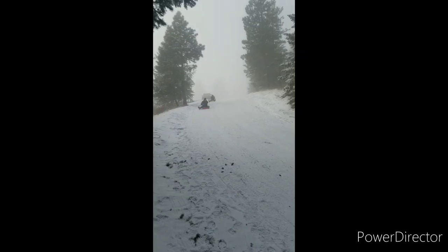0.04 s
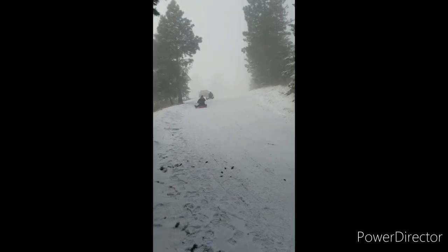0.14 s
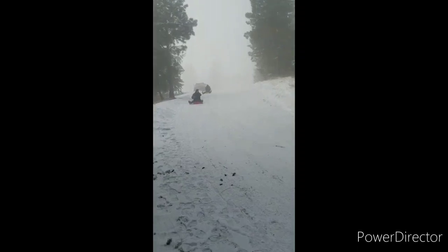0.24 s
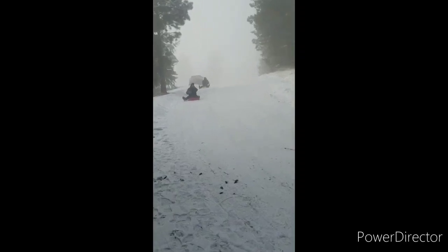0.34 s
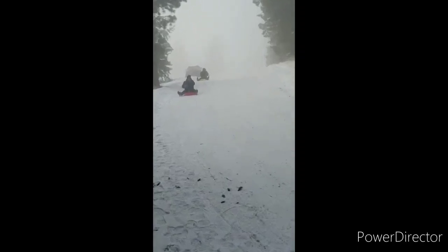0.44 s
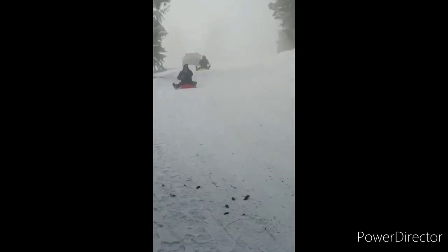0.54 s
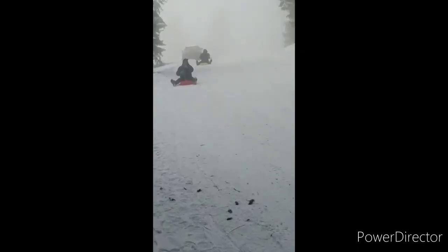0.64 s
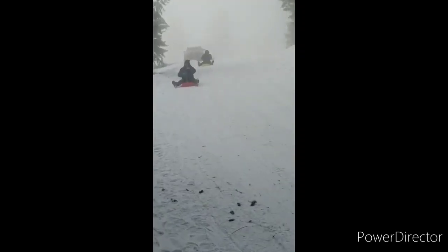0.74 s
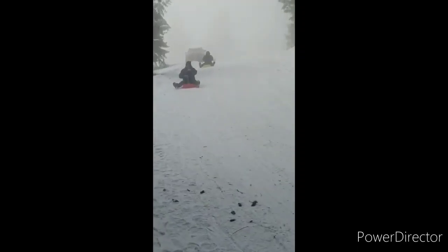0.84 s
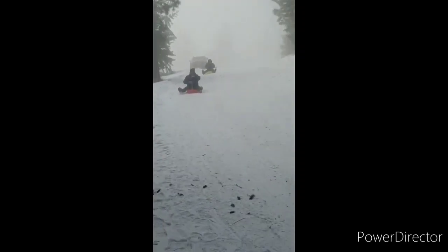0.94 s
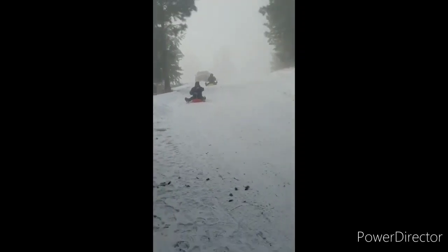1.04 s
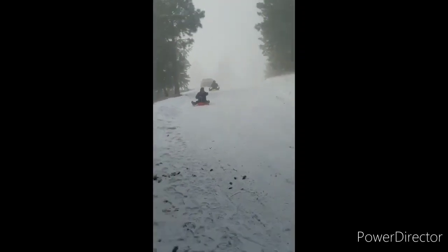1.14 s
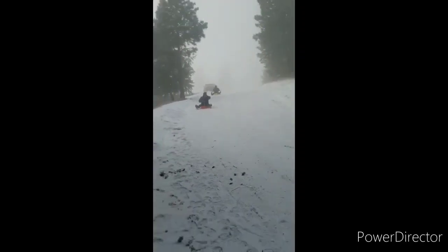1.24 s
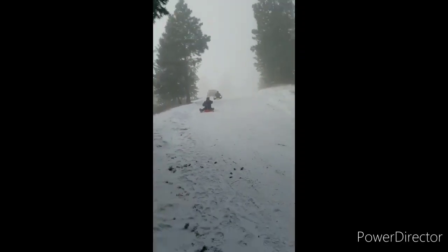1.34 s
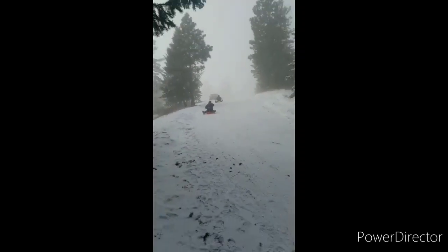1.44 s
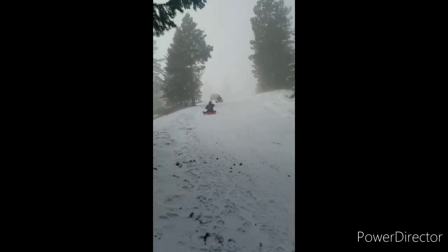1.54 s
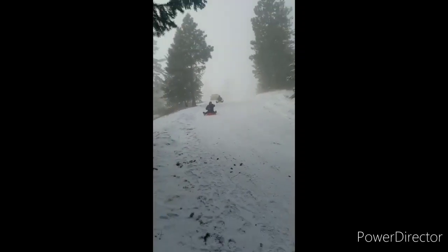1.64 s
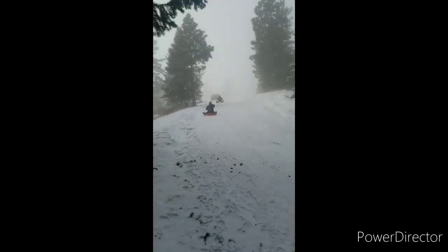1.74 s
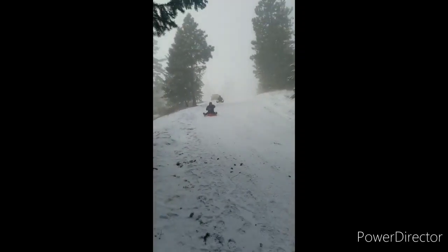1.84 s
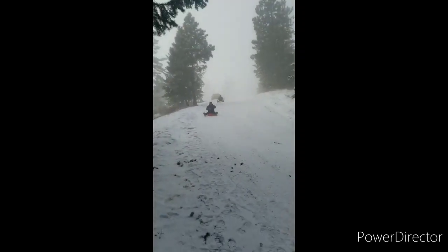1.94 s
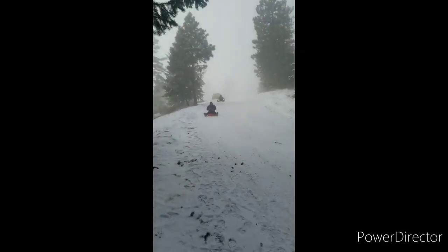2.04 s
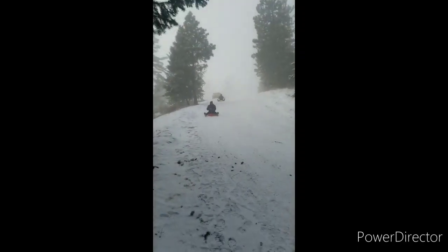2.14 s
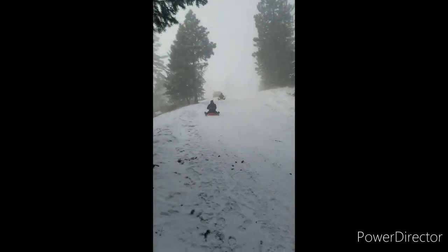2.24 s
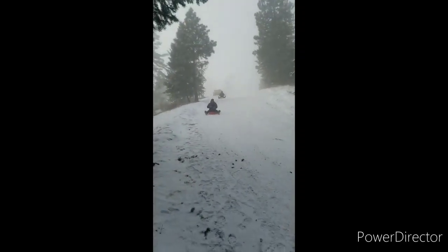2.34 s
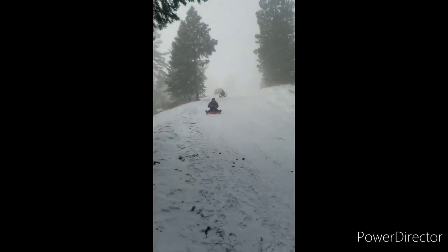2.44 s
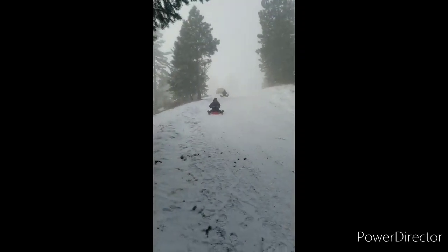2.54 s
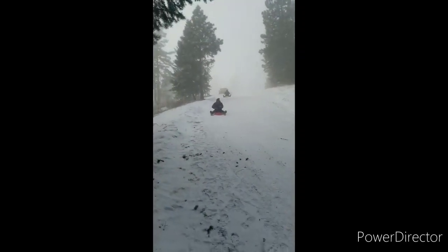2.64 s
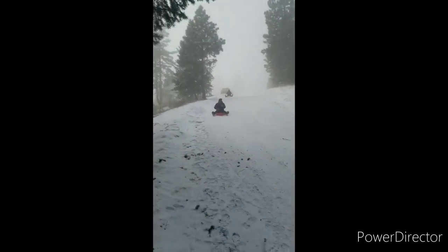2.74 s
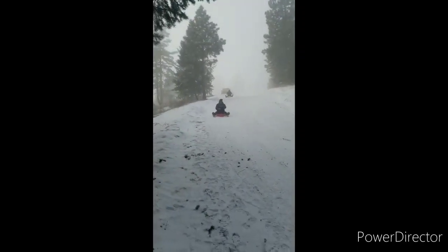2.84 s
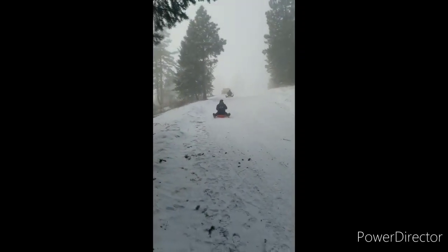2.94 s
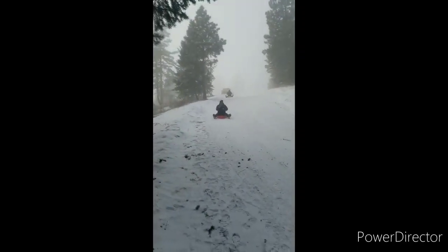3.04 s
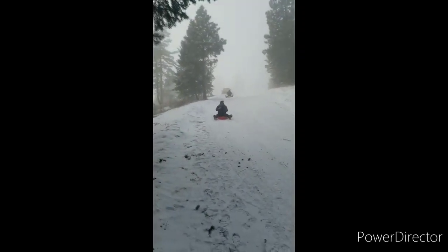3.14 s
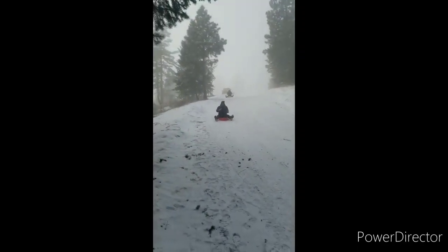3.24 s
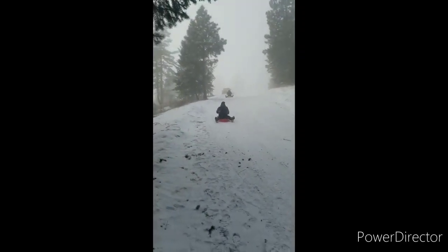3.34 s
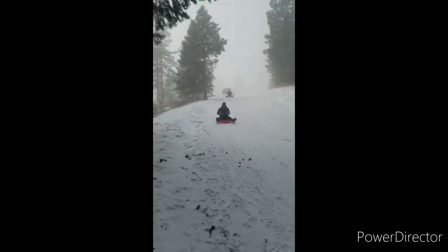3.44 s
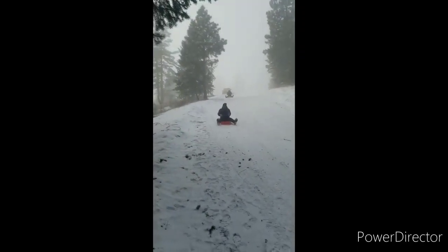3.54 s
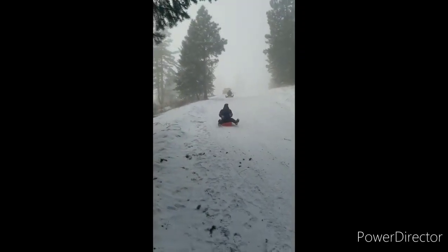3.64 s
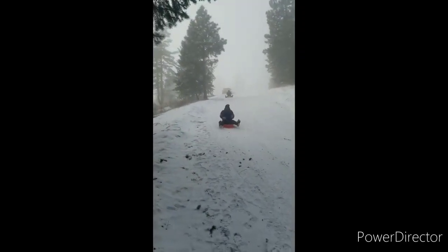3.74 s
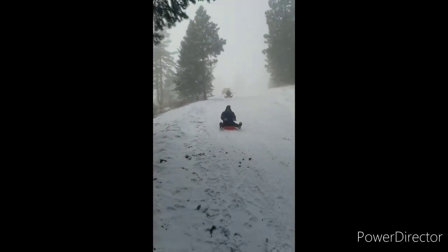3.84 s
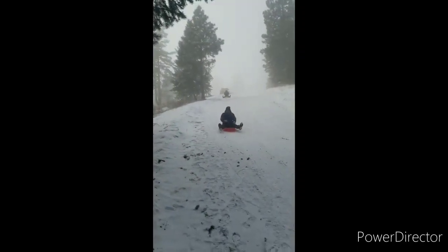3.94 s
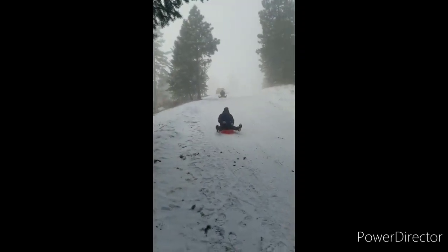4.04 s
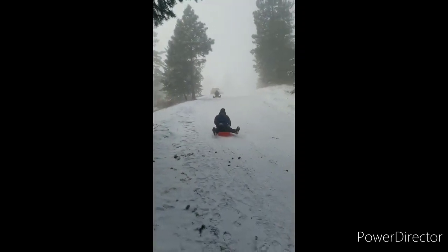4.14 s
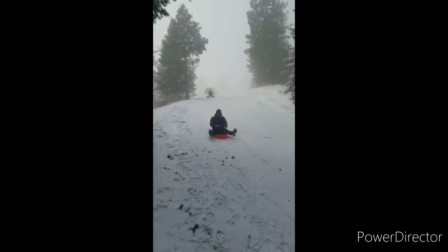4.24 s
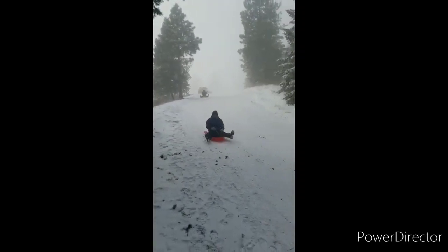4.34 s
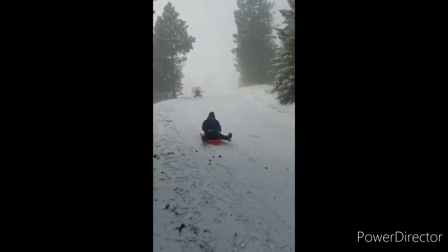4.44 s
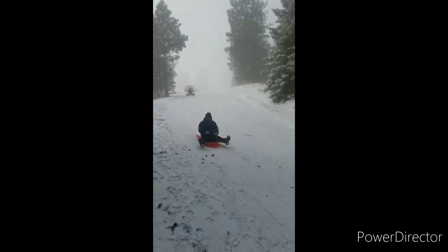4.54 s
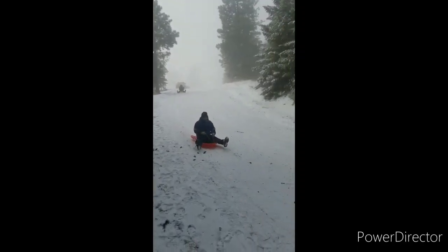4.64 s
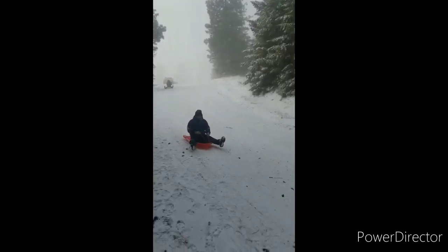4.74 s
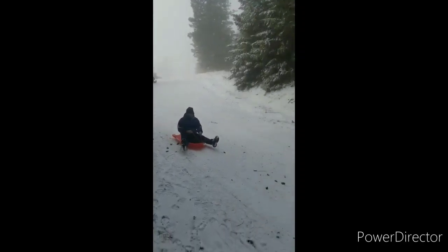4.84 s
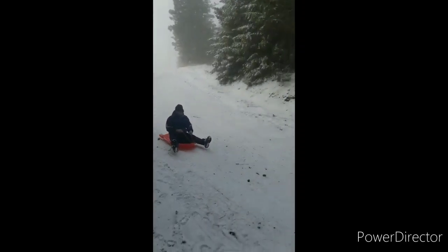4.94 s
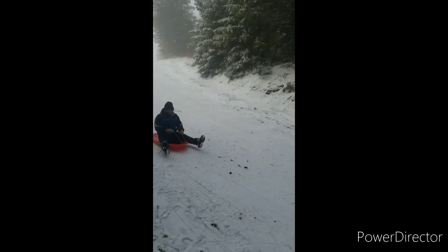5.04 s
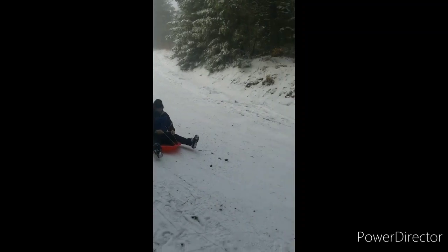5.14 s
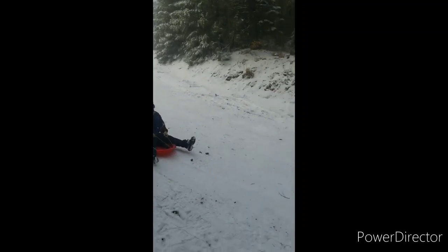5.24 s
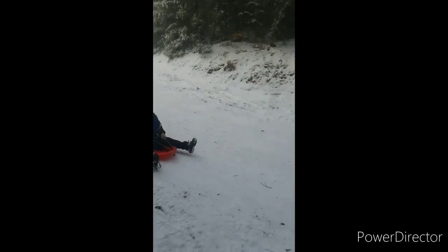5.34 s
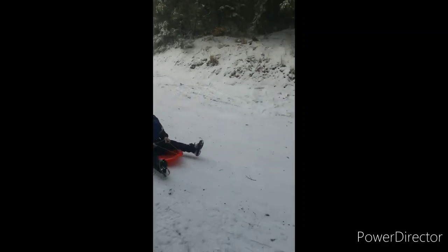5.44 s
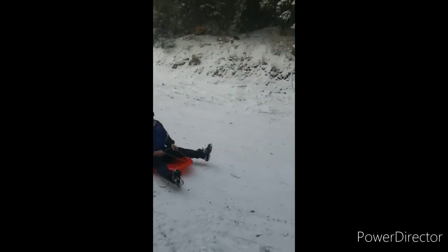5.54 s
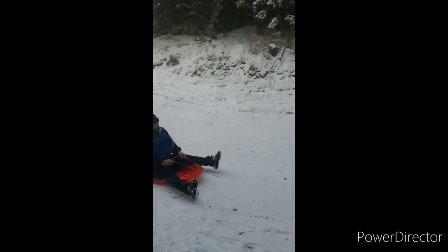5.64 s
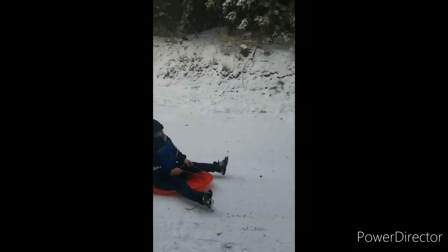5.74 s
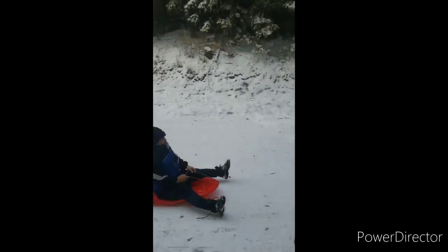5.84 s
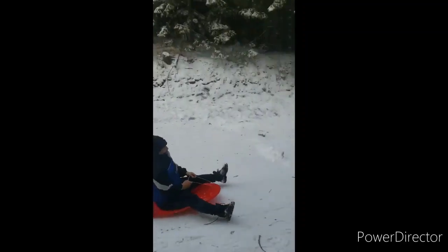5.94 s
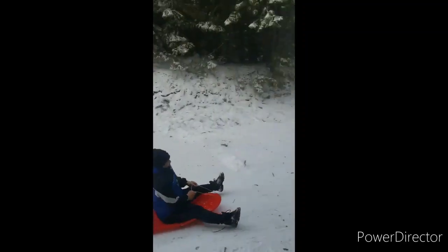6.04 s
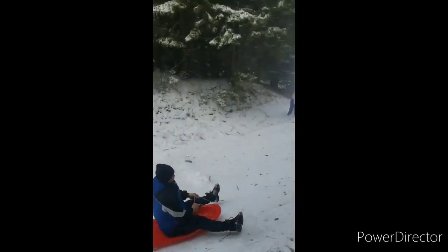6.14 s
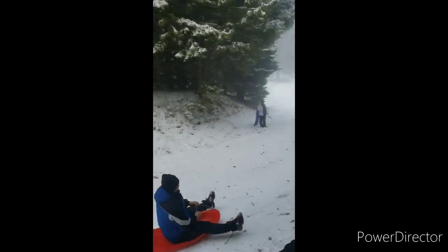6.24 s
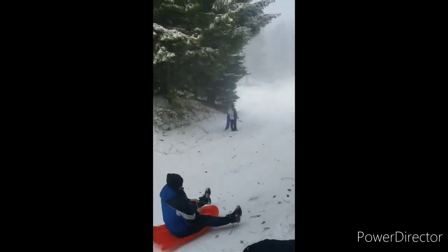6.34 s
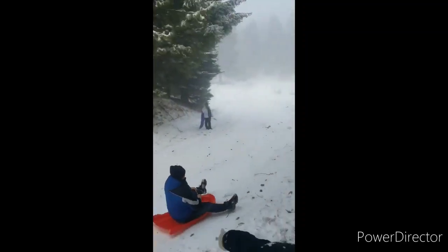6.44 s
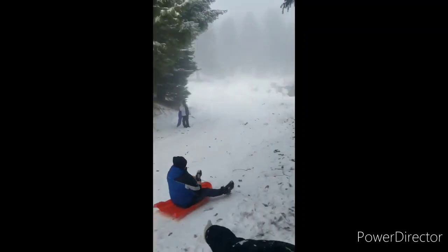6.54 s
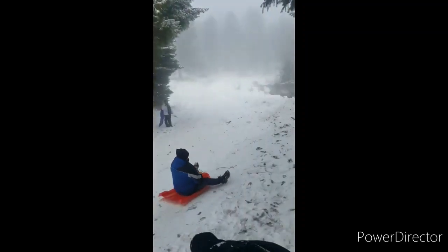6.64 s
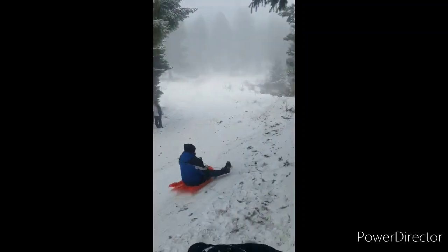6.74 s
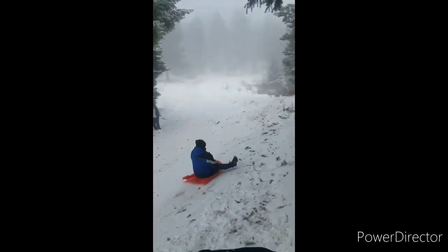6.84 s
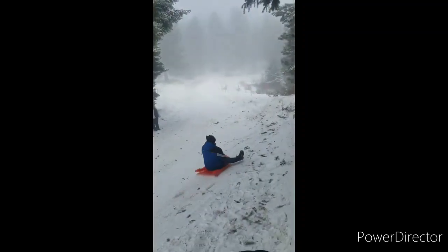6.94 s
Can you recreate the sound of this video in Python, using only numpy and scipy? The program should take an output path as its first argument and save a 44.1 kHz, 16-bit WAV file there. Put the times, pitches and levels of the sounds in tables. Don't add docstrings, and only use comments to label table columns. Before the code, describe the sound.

Outdoors in a still, snowy forest, heard through a hand-held stereo phone with faint microphone hiss. In the first 0.2 seconds, a few dry knocks and crust crunches sound nearby. Until about 3 seconds, the distant sled is a weak, patchy snow hiss with faint low rumble, briefly swelling near 1 second; sharp little flake clicks strike the right side, clustering at 2.7-2.9. From 3.4 the hollow plastic hull drums more clearly, with a tiny falling squeak at 3.85 and firm bumps and knocks around 4.05. From 4.4 to 6 the rough scraping and gritty hiss grow steadily, with frequent low thumps and wall rattles, including a strong thud at 5.55. It is loudest passing close around 6.1; a hard bright crack with a thud hits at 6.39. The scrape eases slightly, then a tight burst of heavy hollow bumps ends it at 6.9.

```python
import sys
import numpy as np
from scipy import signal
from scipy.fft import rfft, irfft
from scipy.io import wavfile
from scipy.ndimage import uniform_filter1d

SR = 44100
rng = np.random.default_rng(int(sys.argv[2]) if len(sys.argv) > 2 else 0)


def master_out(mix):
    frames = np.transpose(np.atleast_2d(mix))
    ceiling = np.clip(frames, -1, 1)
    pcm = np.round(ceiling * 32767).astype(np.int16)
    wavfile.write(sys.argv[1], SR, pcm)


def voltage_ratio(level):
    return 10 ** (np.asarray(level, float) / 20)


N = 308352
T = np.arange(N) / SR

# time_s, hull_load_db, iciness_db, hiss_left_right_db
TRACK = [(0.0, -49.5, 4, 0), (0.3, -49, -4, -5), (.39, -53, -2.5, -6), (.49, -49, -4, -6),
         (.56, -55, -2.5, -7), (0.65, -52.5, -4, -7), (0.76, -64.5, 3.5, -4), (0.97, -42.5, -3.5, 5),
         (1.05, -44, -8, 1), (1.13, -58.5, -7, -7), (1.32, -57, 8, -16), (1.6, -50, -3.5, -8.5),
         (2.0, -58, 2, -16), (2.6, -56, 2, -8.5), (2.94, -49.5, 0.5, -6), (3.36, -58.5, 5, -4),
         (4.1, -46.5, 3.5, -4.5), (5.1, -39.5, 3, -4.5), (5.85, -35, 2.5, -4), (6.12, -33, 2.5, -4.5),
         (6.6, -38.5, 6, -9)]
# peak_s, length_s, hull_press_db, ground_shake_db
RIDGES = [(0.106, 0.045, 8, 16), (0.58, 0.14, -4, 2.5), (0.632, 0.064, 4.5, -12), (1.088, 0.051, -4, 10),
          (1.318, 0.37, -10, 10.5), (1.76, 0.076, -5, -7), (1.8, 0.13, 3.5, 15), (2.118, 0.25, 9.5, 10),
          (2.332, 0.057, 12, 14), (2.41, 0.098, -8.5, 10), (2.508, .2, 11, 15), (2.684, 0.14, 2.5, 19),
          (2.847, 0.095, -9, 11.5), (2.895, .07, 11, 10), (3.45, 0.57, 7, -2), (3.782, 0.072, 13, 6),
          (4.066, 0.096, 12.5, 4.5), (4.482, 0.2, 4, 8), (4.762, 0.034, 4, 10), (4.884, 0.22, 1, 5.5),
          (5.244, .1, 3.5, 9), (5.343, 0.18, 4, 6), (5.54, 0.22, 5.5, 6.5), (5.772, 0.066, 3.5, 12),
          (6.357, 0.07, -3, -13), (6.403, 0.09, 7, 20), (6.463, 0.056, 8, 17.5), (6.609, .14, 6, 8.5),
          (6.892, 0.1, 17, 21.5), (6.985, 0.16, 8, 12)]
# pitch_hz, width_hz, level_db
HULL_MODES = [(154.4, 104, -3), (240, 134, -1), (320, 101, -1.5), (396, 200, -7)]
# pitch_hz, width_hz, level_db
WALL_MODES = [(549, 214, 3.5), (697, 190, 6.5), (858, 250, 5.5), (1031, 220, -1), (1410, 200, -1),
              (1750, 530, -26)]
# pitch_hz, width_hz, level_db
GROUND_MODES = [(65.6, 32, 5), (112, 58, 2)]
# pitch_hz, level_db (per Hz)
HISS = [(880, -7.5), (1500, -5), (1730, -4), (2310, -6), (3000, -9), (3820, -9.5), (5100, -7), (7080, -6.5),
        (9180, -12), (12400, -5), (14000, -8), (15000, -13.5)]
# pitch_hz, width_hz, level_db
SPRAY_MODES = [(1510, 650, -1.5), (2170, 290, -4), (3940, 880, -4)]
# start_s, peak_db, pitch_hz
BUMPS = [(0.305, -38, 280), (0.32, -41, 330), (0.5, -43, 300), (0.655, -46, 320), (6.045, -23, 380),
         (6.085, -24, 360), (5.955, -27, 380), (0.81, -47, 300), (6.41, -24, 280), (6.435, -25, 260),
         (6.46, -24, 300), (1.547, -39, 143), (1.598, -34.5, 375), (1.707, -41, 260), (2.082, -35, 284),
         (2.285, -39.5, 149), (2.47, -32.5, 322), (3.566, -33.5, 203), (3.69, -34, 212), (3.966, -26, 234),
         (4.056, -22, 242), (4.255, -27.5, 258), (4.343, -30.5, 214), (4.525, -30, 185),
         (4.579, -24.5, 243), (4.757, -24, 246), (4.836, -26.5, 236), (4.875, -21.5, 214),
         (5.078, -23.5, 203), (5.317, -17, 219), (5.476, -19.5, 240), (5.774, -17.5, 245),
         (5.807, -23.5, 305), (6.149, -20.5, 240), (6.187, -23, 212), (6.875, -11.5, 200),
         (6.882, -18, 330), (6.891, -16, 190), (6.915, -18, 330), (6.968, -21, 340), (6.907, -12.5, 270),
         (6.955, -16, 300), (6.979, -18.5, 310)]
# start_s, peak_db, pitch_hz
LUMPS = [(0.244, -42, 153), (0.298, -40, 164), (0.559, -54, 164), (0.589, -49, 196), (1.016, -38, 261),
         (1.039, -38, 229), (1.057, -37, 215), (4.459, -31, 277), (4.52, -31, 186), (4.615, -33, 194),
         (4.742, -29, 234), (4.939, -29, 272), (4.997, -31, 205), (5.152, -31, 172), (5.203, -32, 221),
         (5.224, -37, 301), (5.244, -35, 250), (5.492, -24, 226), (5.698, -32, 245), (5.934, -27, 345),
         (6.031, -25, 196), (6.057, -24, 275), (6.134, -24, 234), (6.172, -24, 240), (6.219, -28, 258),
         (6.308, -26, 272), (6.603, -29, 258), (6.757, -34, 328), (6.924, -25, 151), (6.944, -20, 215),
         (6.961, -20, 275)]
# start_s, peak_db, pitch_hz
THUDS = [(0.194, -50, 67.3), (.89, -58, 66), (2.5, -41, 65), (2.654, -36.5, 72), (3.407, -43, 99),
         (1.16, -46, 63), (1.46, -41.5, 64), (1.82, -43, 62), (2.57, -44, 60.3), (5.554, -16.5, 346),
         (6.387, -13.5, 377), (6.51, -33, 62), (6.8, -38, 65.6), (6.385, -24, 75.5), (6.875, -20.5, 75),
         (6.91, -22, 140), (6.94, -24, 66)]
# start_s, peak_db, pitch_hz, left_right_db
KNOCKS = [(0.077, -28.5, 560, -0.5), (0.097, -31.5, 430, -9), (0.151, -33, 622, -12), (2.476, -42, 557, 21),
          (2.892, -42, 710, 8), (3.767, -45, 780, 4), (4.059, -25.5, 533, 8), (4.408, -28.5, 640, 5),
          (4.429, -30, 800, 0.5), (4.458, -28.5, 540, 4), (4.526, -27.5, 576, -0.5), (4.719, -30.5, 630, 3),
          (4.799, -31, 800, 2), (4.873, -26.5, 794, 3), (5.464, -29, 725, -3), (5.554, -20, 593, -2.0),
          (5.582, -24, 870, -3), (5.763, -35, 546, -1.0), (6.032, -20, 720, -1.5), (6.074, -18.5, 675, -3),
          (6.174, -24, 686, -5), (6.381, -15, 1710, -6), (6.3865, -8, 1700, -4), (6.3885, -6, 1760, -4),
          (6.392, -14, 1650, -4), (0.966, -39, 1250, 0), (0.974, -39, 1200, 0), (0.94, -41, 1050, 0),
          (0.995, -41, 1400, 0), (0.079, -33, 1100, -3), (6.873, -19, 540, -3), (6.899, -23, 477, 7)]
# start_s, peak_db, pitch_hz
TAPS = [(0.286, -46, 484), (0.454, -48, 495), (0.489, -48, 703), (0.616, -50, 482), (0.882, -46, 684),
        (0.967, -42, 530), (1.057, -45, 495), (1.5, -49, 678), (1.6, -47, 573), (2.322, -47, 482),
        (2.445, -49, 676), (2.497, -44, 595), (2.522, -47, 565), (3.116, -48, 649), (3.414, -48, 546),
        (3.75, -43, 619), (3.971, -48, 490), (4.344, -41, 587), (4.503, -39, 554), (4.839, -34, 794),
        (4.94, -36, 630), (4.969, -38, 837), (5.045, -38, 649), (5.089, -37, 834), (5.156, -37, 791),
        (5.174, -38, 896), (5.242, -31, 627), (5.319, -33, 546), (5.383, -31, 668), (5.402, -30, 514),
        (5.493, -31, 797), (5.629, -32, 563), (5.662, -35, 482), (5.692, -32, 697), (5.747, -29, 746),
        (5.821, -34, 482), (5.849, -34, 845), (5.939, -31, 635), (6.057, -25, 662), (6.094, -33, 482),
        (6.124, -34, 493), (6.248, -34, 813), (6.291, -33, 1000), (6.315, -32, 929), (6.35, -36, 781),
        (6.464, -35, 487), (6.585, -34, 482), (6.611, -31, 552), (6.646, -34, 773), (6.695, -38, 493),
        (6.731, -35, 482), (6.782, -36, 482), (6.963, -32, 692)]
# time_s, pitch_hz, level_db
SQUEAK = [
    (3.838, 13500, -58),
    (3.848, 7800, -52),
    (3.86, 6300, -47),
    (3.878, 7000, -55),
]
# start_s, length_s, level_db, left_right_db, brightness_db (per octave)
CRUNCHES = [(0.072, 0.028, -41.5, -2, -3.5), (0.121, 0.04, -47, -1, -3), (1.795, 0.066, -63.5, -18, -0.5),
            (2.872, 0.083, -63, 4, 1), (3.843, 0.088, -49, -4, 5), (0.922, .03, -54, 1.5, -1),
            (0.945, .035, -53, 1.5, 0), (0.98, .037, -52, 1.5, 1.5), (4.057, .012, -46, 2, -6),
            (3.765, 0.05, -59.5, 3, 4), (5.372, 0.048, -42, 1, -1.5), (5.538, 0.028, -48, 4, -5),
            (6.377, 0.028, -31, 2.5, -0.5), (6.381, 0.016, -31.5, -20, 2.5),
            (6.435, 0.056, -37.5, -11.5, 1), (6.593, 0.063, -42, -8, -0.5), (6.872, 0.014, -30, -12, 1),
            (6.896, 0.018, -36, -6, -1.5), (6.884, .01, -35, -4, -2), (6.398, .012, -41, -8, 1.5),
            (4.798, .01, -51, 1.5, -3)]
# pitch_hz, level_db
CRUST = [(200, -6), (700, 5.5), (1100, 2), (1800, 6.5), (3200, -3.5), (4600, -7), (6800, -1), (9000, -12.5),
         (12500, 2.5), (15000, -3.5)]
# start_s, click_db, pop_db
FLAKES = [(0.0977, -30, -69), (0.1238, -35.5, -58), (0.1511, -40, -56), (0.201, -48, -49),
          (0.3373, -40.5, -54), (0.365, -60, -54), (0.426, -50, -62), (0.561, -62, -58), (0.704, -50, -66),
          (1.3032, -41, -61), (1.3686, -56, -55), (1.4507, -36, -68), (1.453, -37.5, -50.5),
          (1.7834, -35.5, -65), (1.787, -38, -59), (1.795, -42, -55), (1.932, -50, -50), (2.681, -62, -53),
          (2.696, -56, -45), (2.7195, -55, -45), (2.7543, -37, -40), (2.799, -39, -38),
          (2.8714, -28.5, -42.5)]
# pitch_hz, level_db
PORT_RING = [(1500, -3), (4500, -7), (7200, 0.5), (12800, 1.5), (15800, -4)]
# pitch_hz, level_db (per Hz)
AIR = [(18, -30), (30, 7.5), (296, 1), (1170, -16), (1480, -44), (1690, -5), (2490, -42), (2770, -22),
       (5030, -7), (15000, -14.5)]
# time_s, delay_samples
LAG = [
    (0, -1),
    (4.6, 0),
    (5.1, 1),
    (5.5, 4.6),
    (5.7, 5),
    (5.8, 7),
    (6.15, 7.5),
    (6.3, 9),
    (6.36, 19),
    (6.99, 20),
]
# pitch_hz, left_right_db
PORTS = [(60, 4), (150, -2.0), (380, -20.5), (950, -4.5), (2380, 7.5), (5980, 2.5), (15000, 3)]
# pitch_hz, share
SHARED = [(1500, .65), (4800, .55), (7000, .2), (15000, .05)]
# time_s, lower_hz, upper_hz
CAVITY = [(0.0, 6250, 12200), (0.88, 6400, 12200), (1.19, 6050, 11400), (2.59, 6440, 12000),
          (2.8, 6350, 12700), (3.83, 6600, 12300), (4.15, 6550, 11800), (4.88, 5570, 11800),
          (5.47, 5460, 13500), (5.96, 6900, 14400), (6.56, 7160, 12100), (6.99, 6800, 12100)]
# pitch_hz, under_neighbours_db
SPARED = [(1500, -20), (2200, -8), (2700, -6), (3400, -5), (4400, -5), (5500, -7), (7500, -6), (8700, -3.6),
          (10200, -3.6), (11300, -7.5)]
# start_s, end_s, from_hz, to_hz, width_hz
STARVED = [
    (5.46, 5.65, 4250, 4850, 450),
    (5.77, 5.91, 2950, 3050, 800),
    (5.93, 6.13, 3050, 3250, 420),
    (6.94, 6.99, 5100, 5000, 500),
]


def evened(x):
    return x / np.sqrt(np.mean(x ** 2) + 1e-20)


def smoothed_twice(x, size, axis=-1):
    return uniform_filter1d(uniform_filter1d(x, size=size, axis=axis), size=size, axis=axis)


def read(points, hz):
    f, value = np.transpose(points)
    return np.interp(np.log(hz + 1), np.log(f + 1), value)


def control(column):
    rows = np.array(TRACK)
    return np.interp(T, rows[:, 0], rows[:, column])


def hull_load():
    return control(column=1) + 50


def ridges(column):
    climb = 0.45
    total = 0
    for row in RIDGES:
        peak_s, length_s = row[:2]
        times = (peak_s - climb * length_s, peak_s, peak_s + (1 - climb) * length_s)
        total = total + np.interp(T, times, (0, row[column], 0))
    return total


def add(mix, s, sound):
    part = mix[..., round(s * SR):][..., :sound.shape[-1]]
    part += sound[..., :part.shape[-1]]


def sides(pan_db):
    return np.array([voltage_ratio(pan_db / 2), voltage_ratio(-pan_db / 2)])


def ring(x, modes):
    out = 0
    for k, (hz, width_hz, db) in enumerate(modes):
        peak = signal.iirpeak(hz, hz / width_hz, SR)
        once = signal.lfilter(*peak, x)
        out = out + (-1) ** k * voltage_ratio(db) * signal.lfilter(*peak, once)
    return evened(out)


def grit(per_s, spread_db, smooth):
    size = voltage_ratio(spread_db * np.minimum(rng.exponential(1, (2, N)), 4))
    struck = rng.random((2, N)) < per_s / SR
    knocks_in_time = size * rng.choice([-1., 1.], (2, N)) * struck
    return evened(knocks_in_time) + smooth * rng.standard_normal((2, N))


def heard(pair, same, pan_db):
    lag = np.interp(T, *np.transpose(LAG))
    late = np.interp(np.arange(N) - lag, np.arange(N), pair[0])
    left = same * late + np.sqrt(1 - same ** 2) * pair[1]
    return sides(pan_db)[:, None] * np.array([left, pair[0]])


def coloured(spectrum, patchy_db, flicker_db, tilt, shared, cavity_db):
    frames = N // 128 + 5
    hz = np.fft.rfftfreq(512, 1 / SR)[:, None]
    t = np.arange(frames) * 128 / SR
    a, b = rng.standard_normal((2, 2, 257, frames))
    own, right = a + 1j * b
    drift = uniform_filter1d(rng.standard_normal((frames, 257)), size=40, axis=0)
    patches = evened(uniform_filter1d(drift, size=5)).T
    flicker = evened(uniform_filter1d(rng.standard_normal(frames), size=5))
    same = np.clip(read(shared, hz), 0, 1)
    late = np.exp(-2j * np.pi * hz * np.interp(t, *np.transpose(LAG)) / SR)
    left = same * late * right + np.sqrt(1 - same ** 2) * own
    s, low_hz, high_hz = np.transpose(CAVITY)
    cavity = 0
    for centre_hz, width_hz in ((low_hz, 450), (high_hz, 500)):
        cavity = cavity + np.exp(-((hz - np.interp(t, s, centre_hz)) / width_hz) ** 2)
    z = np.array([left, right * voltage_ratio(cavity_db * cavity)])
    z *= voltage_ratio(read(spectrum, hz) + patchy_db * patches + flicker_db * flicker) * sides(read(tilt, hz))
    return evened(signal.istft(z, nperseg=512, noverlap=384)[1][:, :N])


def drum():
    level_db = hull_load() + ridges(column=2) - 52.5
    return voltage_ratio(level_db) * heard(ring(grit(260, 3.47, 0.8), HULL_MODES), 0.96, -2.5)


def scrape():
    load, press = hull_load(), ridges(column=2)
    stall_db = 0.82 * np.minimum(load + press - 50 + 54.5, 0)
    walls_db = -57.5 + 1.14 * load + 1.04 * press + 0.067 * control(column=2) + stall_db
    return voltage_ratio(walls_db - 4.0) * heard(ring(grit(800, 4.8, 0.62), WALL_MODES), 0.84, 0.059)


def rumble():
    level_db = -54 + 0.85 * hull_load() + ridges(column=3) - 2.5
    return voltage_ratio(level_db) * heard(ring(grit(60, 2.3, 0.79), GROUND_MODES), 0.71, -3.0)


def hiss():
    shear_db = -60 + 0.99 * hull_load() + control(column=2) + 0.42 * ridges(column=2)
    crystals = coloured(HISS, 2.15, 0.91, PORTS, SHARED, 3.9)
    return voltage_ratio(shear_db + 3.0) * sides(control(column=3)) * crystals


def spray():
    level_db = -72.5 + 1.74 * (hull_load() - 1)
    return voltage_ratio(level_db) * heard(ring(grit(1500, 2.4, 0.75), SPRAY_MODES), 0.23, -2.4)


def bumps():
    out, t = np.zeros(N), np.arange(2000) / SR
    struck = [(s - 0.00362, db - 6.5, 310) for s, db, hz, _ in KNOCKS if hz < 1000]
    further = [(s, db + 0.5, hz) for s, db, hz in LUMPS]
    for s, db, hz in BUMPS + THUDS + struck + further:
        swing = -np.sin(2 * np.pi * hz * t * (1.15 - 9 * t))
        body = swing * (1 - np.exp(-t / 0.0015)) * np.exp(-t * hz / 1.2)
        add(out, s, voltage_ratio(db + 2.0) * body)
    out = signal.lfilter(*signal.butter(2, 36, "high", fs=SR), out)
    return heard(np.array([out, out]), 1, -2.5)


def knocks():
    out, t = np.zeros((2, N)), np.arange(800) / SR
    further = [(s, db + 4.0, hz, -2.1) for s, db, hz in TAPS]
    for s, db, hz, pan_db in KNOCKS + further:
        wall = np.sin(2 * np.pi * hz * t)
        if hz < 1000:
            wall = wall + 0.4 * np.sin(2 * np.pi * 2.74 * hz * t) * np.exp(-t / 0.002)
        wall = wall * (1 - np.exp(-t / 0.0003)) * np.exp(-t * hz / 2.2)
        late_s = round(np.interp(s, *np.transpose(LAG))) / SR
        for port, delay_s, gain in zip(out, (late_s, 0), sides(pan_db)):
            add(port, s + delay_s, -gain * voltage_ratio(db - 1.0) * wall)
    return out


def squeak():
    s, hz, db = np.transpose(SQUEAK)
    t = np.arange(s[0], s[-1], 1 / SR)
    wobble = evened(uniform_filter1d(rng.standard_normal((2, 2400)), size=40))[:, :len(t)]
    tone = np.sin(2 * np.pi * np.cumsum(np.interp(t, s, hz)) / SR)
    out = np.zeros((2, N))
    add(out, s[0], voltage_ratio(np.interp(t, s, db)) * wobble * tone)
    return out


def crunches():
    out = np.zeros((2, N))
    hz = np.fft.rfftfreq(8192, 1 / SR)
    for s, length_s, db, pan_db, tilt_db in CRUNCHES:
        n = min(round(length_s * SR), 4400)
        cracks = rng.standard_normal((3, 4400))
        ragged = voltage_ratio(3.5 * evened(uniform_filter1d(cracks[2], size=40)))
        burst = ((cracks[:2] + 0.59 * cracks[0]) * ragged)[:, :n]
        part = np.arange(n) / n
        burst = burst * np.minimum(part / 0.22, 1) * (1 - part) ** 0.29
        colour = voltage_ratio(read(CRUST, hz) + tilt_db * np.log2(hz / 3000 + 0.12))
        sound = irfft(rfft(burst, 8192) * evened(colour))
        add(out, s, voltage_ratio(db + 1.5) * sides(pan_db)[:, None] * sound)
    return out


def flakes():
    out, t = np.zeros((2, N)), np.arange(1200) / SR
    pop = -np.cos(2 * np.pi * 190 * t ** 0.948) * np.exp(-t / 0.002) * (1 - np.exp(-t / 0.0003))
    decay = np.exp(-t / 0.00017) + 0.04 * np.exp(-t / 0.00268)
    for s, click_db, pop_db in FLAKES:
        click = 0
        for hz, db in PORT_RING:
            uneven_db = 3.5 * rng.uniform(-1, 1)
            click = click + voltage_ratio(db + uneven_db) * np.sin(2 * np.pi * hz * t) * decay
        sound = -3.6 * voltage_ratio(click_db) * click + voltage_ratio(pop_db + 23.5) * pop
        add(out, s + 1 / 1200, np.outer([.08, 1], sound))
    return out


def air():
    tilt = [(30, -14.0), (15000, -1.5)]  # pitch_hz, left_right_db
    unshared = [(300, 0.0), (2000, 0)]  # pitch_hz, share
    return voltage_ratio(-59.5) * coloured(AIR, 0.82, 0.91, tilt, unshared, 3.8)


def thinned(pair, holes=()):
    hz, t, z = signal.stft(pair, SR, nperseg=2048, noverlap=1536)
    narrow = uniform_filter1d(uniform_filter1d(abs(z) ** 2, size=7, axis=1), size=4, axis=2)
    narrow_db = 10 * np.log10(abs(narrow) + 1e-16)
    neighbours_db = uniform_filter1d(narrow_db + narrow_db.mean(0), size=161, axis=1) / 2
    under_db = narrow_db - neighbours_db
    level_db = narrow_db.mean((0, 1))
    quiet_db = np.percentile(level_db, 90) - level_db
    under_db -= np.clip(.13 * quiet_db, 0, 1.7) - .3
    for start_s, end_s, from_hz, to_hz, width_hz in holes:
        centre_hz = np.interp(t, (start_s, end_s), (from_hz, to_hz))
        inside = abs(hz[:, None] - centre_hz) < width_hz / 2
        under_db[0] -= 8 * (inside & (t > start_s) & (t < end_s))
    keep = np.clip(under_db - read(SPARED, hz)[:, None] + 1, .02, 1)
    return signal.istft(z * keep, nperseg=2048, noverlap=1536)[1][:, :N]


def topped(pair):
    low, wide = (signal.oaconvolve(pair, signal.firwin(301, hz, window=("kaiser", 5), fs=SR)[None], "same")
                 for hz in (14600, 16500))
    top = wide - low
    quick, slow = (abs(uniform_filter1d(top ** 2, size=n, axis=1)) + 1e-18 for n in (40, 600))
    opened = smoothed_twice(1. * (quick > voltage_ratio(20) * slow), 40, axis=1)
    return low + voltage_ratio(-15) * top * opened


def scene():
    sliding = drum() + scrape() + rumble() + hiss() + spray()
    struck = bumps() + knocks() + squeak()
    return sliding + struck + crunches() + flakes() + air()


def roll_off(x):
    return signal.sosfilt(signal.butter(12, 16480, fs=SR, output="sos"), x)


def record(dry):
    turn = np.array([[1, 0.91], [1, -1.004]]) / np.sqrt(2)
    mid_side = turn @ thinned(dry)
    thin = turn @ thinned(mid_side, STARVED)
    return roll_off(topped(thin))


dry = scene()
out = record(dry)
master_out(out)
```